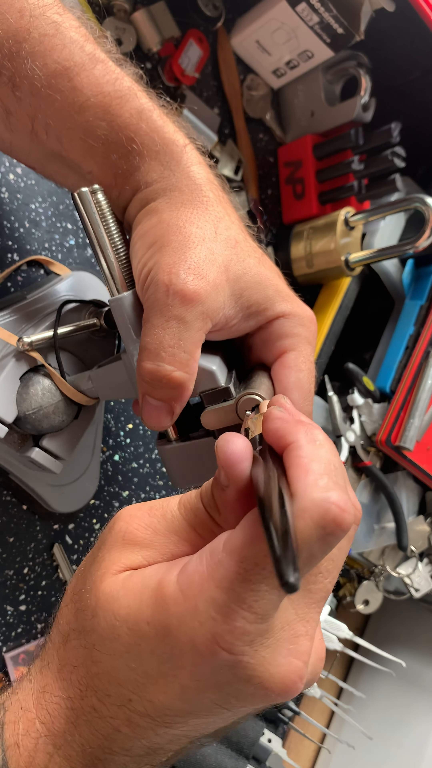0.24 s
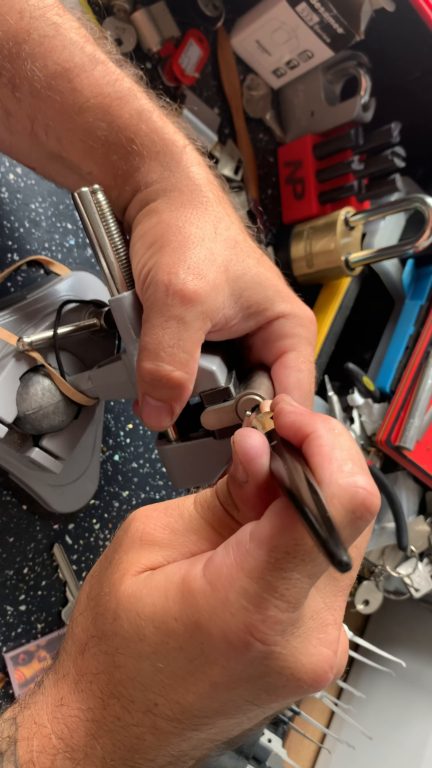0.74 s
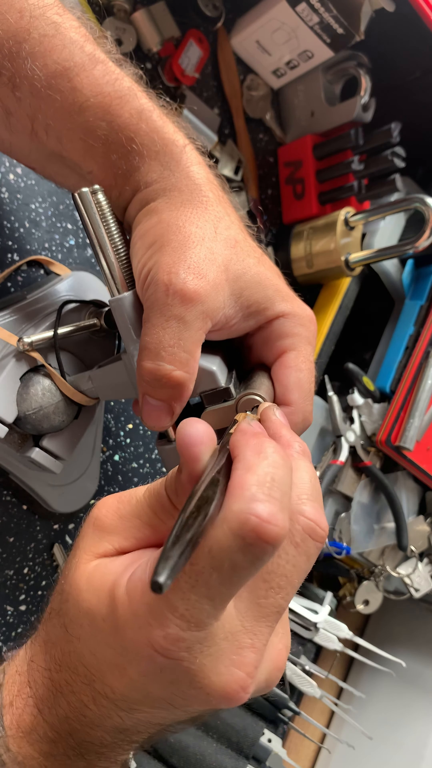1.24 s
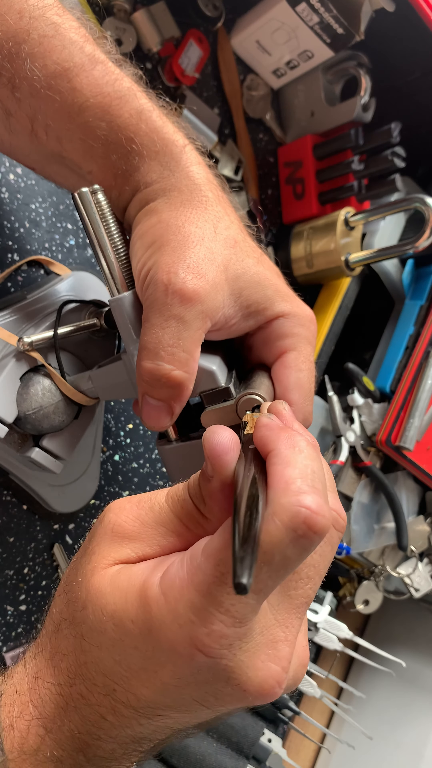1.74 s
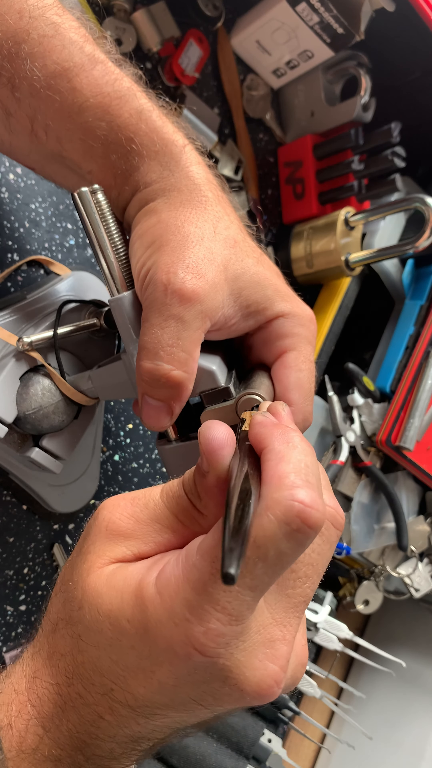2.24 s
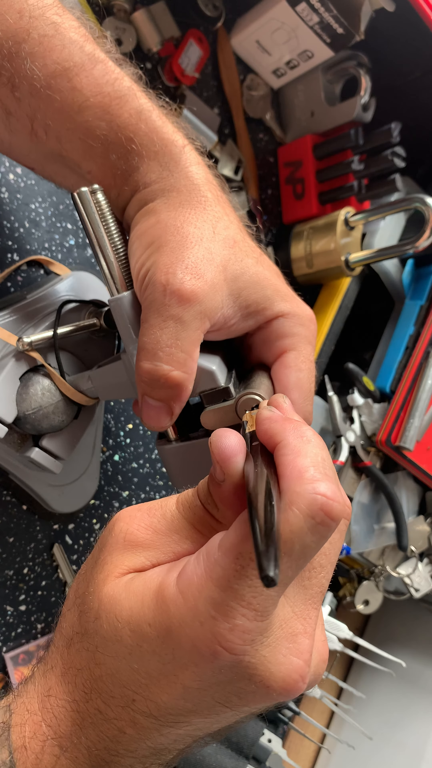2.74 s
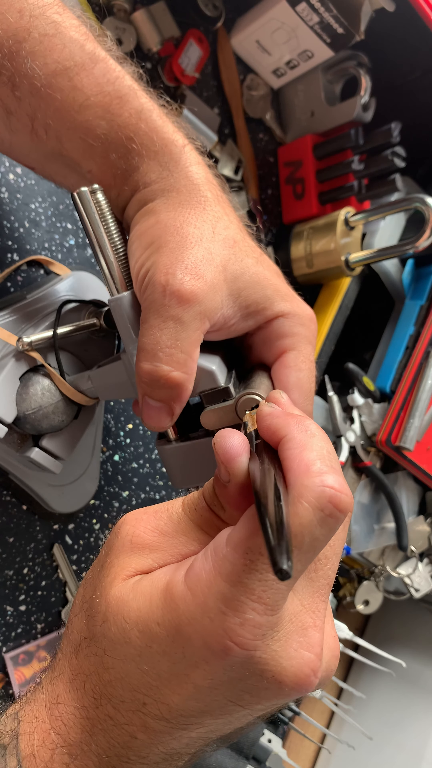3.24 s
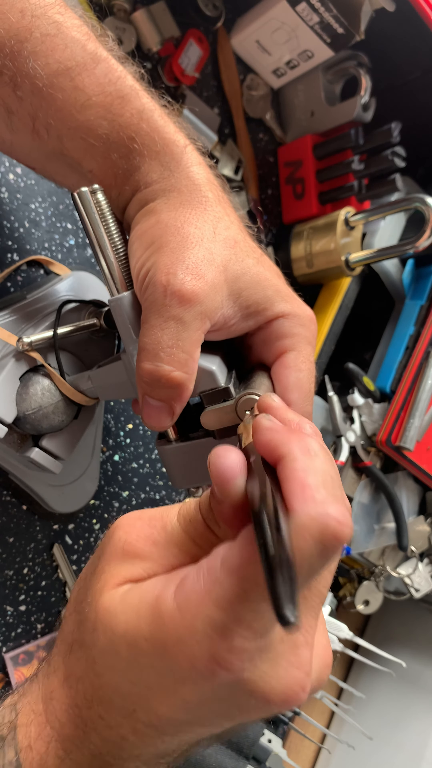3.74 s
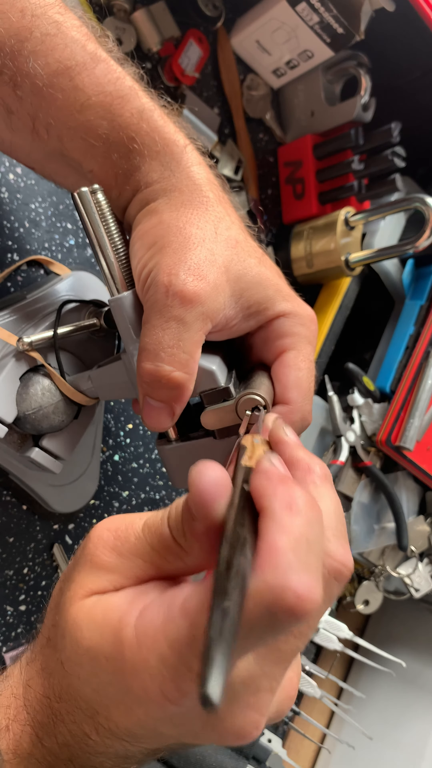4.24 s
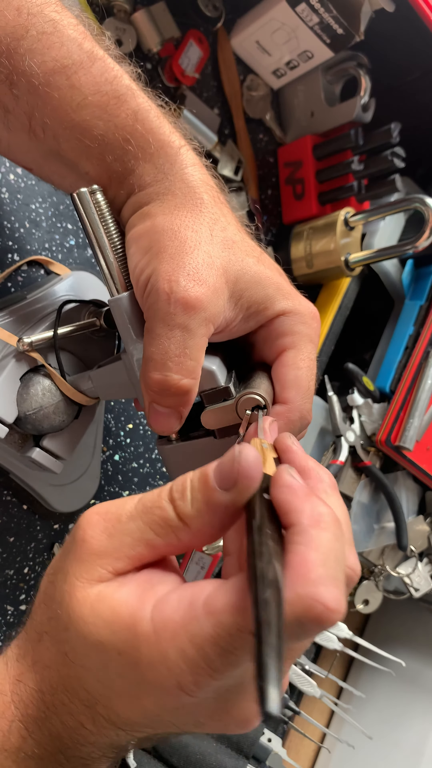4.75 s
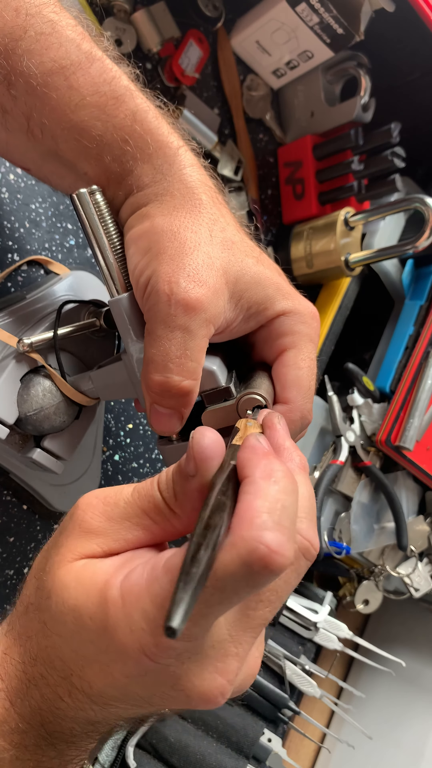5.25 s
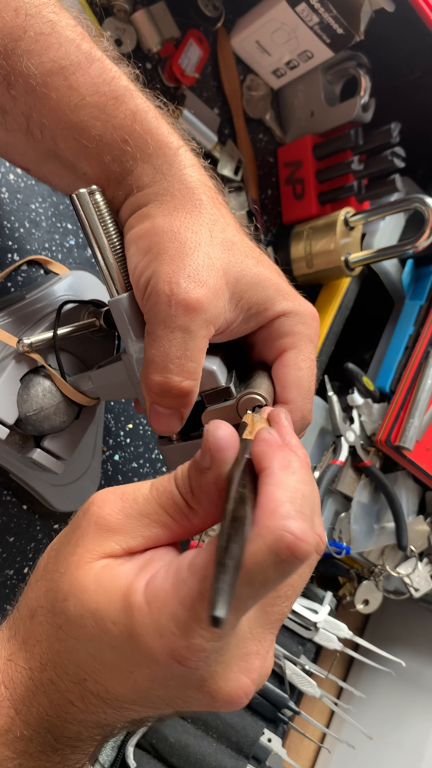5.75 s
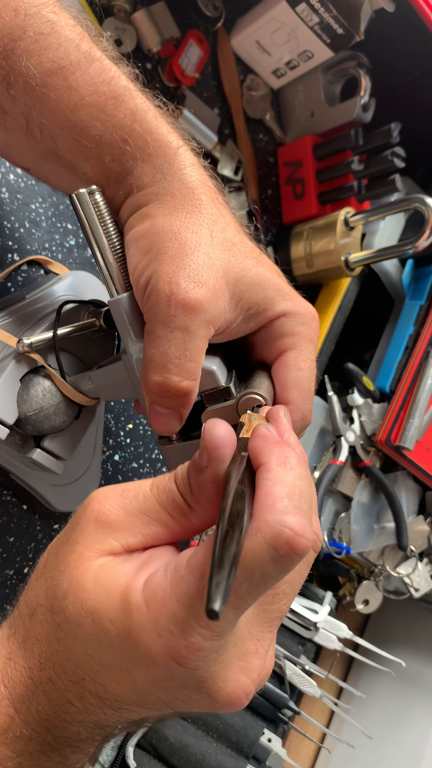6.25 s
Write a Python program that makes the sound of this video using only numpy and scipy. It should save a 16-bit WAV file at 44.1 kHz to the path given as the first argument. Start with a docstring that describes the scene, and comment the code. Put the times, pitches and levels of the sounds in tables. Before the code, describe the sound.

Close, crisp lock-pin snaps and faint scrapes in a quiet small room, broken by a sharp double clack, with a faint clock-like whirr each second.

```python
"""Still air with a wavering hum and a faint rub of hands, then the ticks and snaps of a lock being picked.
A steel pick works the pins of a lock cylinder held in a bench vise, close below the microphone in a small room.
Noise bursts ring the modes of lock and blade; once the plug gives way with a loud, rattling clack that sets
the bench modes swinging. Scrapes, rattles and taps of the blade are gritty noise or impacts in such modes too.
Soft knocks are filtered pushes; a noisy, gritty whirr comes once a second, likely a wall clock."""
import sys
import numpy as np
from scipy import signal
from scipy.fft import rfft, irfft
from scipy.io import wavfile

SR = 44100
rng = np.random.default_rng(int(sys.argv[2]) if len(sys.argv) > 2 else 0)


def generate_wav(sig):
    """Save sig (samples, or channels by samples) to the path in sys.argv[1] as 16-bit PCM at SR."""
    pcm = np.round(np.clip(np.atleast_2d(sig).T, -1, 1) * 32767).astype(np.int16)
    wavfile.write(sys.argv[1], SR, pcm)


N = 285768
TIME, FREQS = np.arange(N) / SR, np.fft.rfftfreq(N, 1 / SR)
CLICK_SIZE, SCRAPE_SIZE = 2048, 8192  # samples

# Resonances of the lock body. Each row: frequency in Hz, width in Hz, level in dB.
LOCK_MODES = [(1347.5, 120, -7), (1940, 233, 4), (1947, 110, 1), (3010, 260, -6.5), (3630, 540, -3),
              (4130, 390, -0.5), (5320, 130, 3), (6076, 320, 5.5), (6800, 200, -4.5), (7345, 120, -3),
              (8080, 660, -7.5), (10000, 390, 1.5), (10515, 150, 4), (11330, 150, 1), (12040, 320, 7),
              (13120, 760, 0.5), (15700, 840, -2.5), (14300, 420, -5)]


def from_db(db):
    """Decibels to gain."""
    return 10 ** (np.asarray(db) / 20)


def at_hz(points, hz):
    """Read a table of (Hz, value) on a log-frequency axis."""
    table_hz, values = np.array(points).T
    return np.interp(np.log(hz + 1), np.log(table_hz), values)


def add(track, s, sound):
    """Mix a sound in at a time in seconds."""
    start = max(round(s * SR), 0)
    track[start:start + len(sound)] += sound[:N - start]


def diffuse(size):
    """Spectra of white noise from all around, as the two microphone ports hear it."""
    # How alike diffuse sound is at the two ports. Each row: frequency in Hz, correlation from -1 to 1.
    likeness = [(60, 1), (250, 0.4), (520, -.2), (1000, .4), (2000, 0.1), (3500, 0.5), (5000, .93),
                (15000, .88)]
    alike = np.clip(at_hz(likeness, np.fft.rfftfreq(size, 1 / SR)), -1, 1)
    mid, side = rfft(rng.standard_normal((2, size)))
    return np.sqrt((1 + alike) / 2) * mid + np.sqrt((1 - alike) / 2) * side * [[1], [-1]]


def coloured_noise(colour):
    """Stereo noise of a given spectrum, rms 1."""
    noise = irfft(diffuse(N) * from_db(at_hz(colour, FREQS)), N)
    return noise / noise.std()


def uneven(size, depth_db, step_s):
    """A gain that wanders in straight lines between random levels, one per step; rms 1."""
    steps = np.arange(size) / SR / max(step_s, .001)
    levels_db = depth_db * np.interp(steps, np.arange(size), rng.standard_normal(size))
    gain = from_db(levels_db)
    return gain / np.sqrt(np.mean(gain ** 2))


def resonate(impacts, modes, crack_db, scatter_db, detune=0.0091):
    """Impacts ring a set of modes, a little differently each time, and are heard bare as well."""
    sound = from_db(crack_db) * impacts
    for hz, width, db in modes:
        r = np.exp(-np.pi * width / SR)  # pole radius: a wider mode dies sooner
        hz = hz * (1 + detune * rng.uniform(-1.0, 1))
        feedback = [1, -2 * r * np.cos(2 * np.pi * hz / SR), r * r]
        ringing = signal.lfilter([(1 - r * r) / 2, 0, (r * r - 1) / 2], feedback, impacts + 1e-18)
        sound = sound + from_db(db + scatter_db * rng.standard_normal()) * ringing
    return sound


def contact(length_ms, modes, crack_db, scatter_db, grit_db):
    """Metal slips on metal: a dying burst of tiny impacts rings the modes; energy of 1 ms at full scale."""
    ms = np.arange(CLICK_SIZE) * 1000 / SR
    age = ms / max(length_ms, .5)
    impacts = rng.standard_normal(CLICK_SIZE) * from_db(grit_db * rng.standard_normal(CLICK_SIZE))
    impacts *= (1 - np.exp(-age * 6.6)) * np.exp(-age * 1.1)
    sound = resonate(impacts, modes, crack_db, scatter_db)
    return sound * np.sqrt(SR / 1000 / np.sum(sound ** 2))


def tinted(sound, colour):
    """Give a short sound a broad tone colour, with minimum phase so that nothing comes early."""
    size = len(sound)
    gain = from_db(at_hz(colour, np.fft.rfftfreq(size, 1 / SR)))
    cepstrum = irfft(np.log(gain))
    # folding the cepstrum onto positive times gives the minimum phase
    cepstrum[1:size // 2] *= 2
    cepstrum[size // 2 + 1:] = 0
    return irfft(rfft(sound) * np.exp(rfft(cepstrum)))


def background(air_db=-73, hum_hz=51, hum_db=-69.5):
    """Still air and hiss are shaped noise; the low hum is a sine whose level wavers slowly."""
    # Spectrum of room air and microphone hiss. Each row: frequency in Hz, level in dB.
    air = [(20, -12), (45, 3.5), (70, -1.5), (110, -9), (250, -22), (500, -27), (1000, -32.5),
           (2000, -25.5), (4000, -33), (6300, -28.5), (8000, -33.5), (12000, -30.5), (14500, -34.5),
           (16000, -43)]
    waver = coloured_noise([(1, 0), (5, 0), (20, -40), (100, -120)])[0]
    hum = np.sqrt(2) * from_db(hum_db + 1.6 * waver) * np.sin(2 * np.pi * hum_hz * TIME)
    return hum + from_db(air_db) * coloured_noise(air)


def hands():
    """Skin shifting on the vise in small uneven moves rumbles through the bench."""
    # How strongly the hands rub, joined by straight lines. Each row: time in seconds, level in dB.
    handling = [(0.0, -75), (0.379, -71), (0.72, -76), (0.97, -75.5), (1.19, -70), (1.39, -65), (1.5, -72),
                (1.84, -78), (2.09, -78.5), (2.42, -72), (2.67, -78), (2.87, -74.5), (3.121, -76),
                (3.3, -69.5), (3.542, -75), (3.742, -48), (3.86, -60), (3.92, -71), (4.059, -72.5),
                (4.31, -65), (4.53, -72), (4.67, -74), (5.2, -69), (5.45, -65), (5.65, -72), (5.9, -63),
                (6.04, -64.5), (6.169, -70), (6.48, -61.5)]
    # Spectrum of the rumble. Each row: frequency in Hz, level in dB.
    hand_colour = [(40, -9), (75, 0), (120, -3.5), (160, 5), (200, -6), (320, -5.5), (500, -17.5),
                   (1000, -20.5), (3000, -29), (12000, -53)]
    s, db = np.transpose(handling)
    effort = from_db(np.interp(TIME, s, db))
    return effort * uneven(N, depth_db=3.5, step_s=0.044) * coloured_noise(hand_colour)


def pins(crack_db, scatter_db, hard_crack_db=14.5):
    """Each pin snaps at its own depth and so has its own colour; harder snaps crack more and ring less."""
    # Snaps of pins and plug. Each row: start in seconds, level in dB before a 3 dB cut, length of the
    # contact in ms, then colour in dB against the middle band at 1, 2, 10 and 14 kHz.
    pin_clicks = [(0.1509, -42, 2.7, -5, 0, -15, -16), (0.1887, -29, 2.1, 2, 2, 4.5, -7.5),
                  (0.2909, -66, 1.9, 26.5, 16, -19, -7), (0.951, -46.5, 3.3, -23, -12, 9, -14),
                  (0.9686, -33.5, 2.3, -17, 5, -7, -6), (0.9786, -46, 2.4, 0, 0, -1.5, -12),
                  (1.0237, -41, 3.9, 3.5, 11.5, 4, -12), (1.0612, -42, 5.6, -16, -2, 0, -18),
                  (1.1056, -47.5, 2.7, -24, -3, -4, -11), (1.215, -46.5, 3.3, -2, -3, 2.5, -22),
                  (1.23, -47, 4.8, -9, 2, -16, -16), (1.404, -44, 2.4, 5.5, -8, -11, -17),
                  (1.5628, -49, 2.9, -10, 0, -14.5, -17), (2.3014, -46, 1.4, -9, -11, -5, -8),
                  (2.8588, -40.5, 2, -6, 11, -5, -11), (2.9438, -18, 2.5, -13.5, 0.5, 4.5, -1.5),
                  (3.3825, -39, 1.3, -2, 6, 2, 1.5), (3.6645, -33.5, 1.9, -11, 1.5, 6, -4),
                  (3.7233, -4, 6.2, -7, -4, 5, -1), (3.73, -18, 9.6, -9, 1, 3, 5),
                  (3.7387, -7, 8.3, -11, -9, 7, 0), (3.752, -16.5, 1.9, -28, 8.5, 14, -7),
                  (3.8897, -23.5, 2.9, -31, -6, 5.5, 7), (4.016, -30.5, 3, -13.5, 2, 0.5, 3.5),
                  (4.037, -33, 4.7, -18.5, -8.5, -14.5, -7), (4.044, -44, 1.9, -6.5, 8, -8, -9.5),
                  (4.094, -52.5, 2.2, -4.5, -5.5, -1, -16), (4.9013, -49.5, 2.16, -5.5, -8, 5, 2.5),
                  (4.9398, -49.5, 2.5, -12, -10.5, 0.5, 4), (5.153, -38.5, 7, -0.5, -8.5, -9.5, -10.5),
                  (5.4875, -39.5, 2.2, 12.5, -3, -10.5, -24.5), (5.688, -51, 3, -4, 4, 6, -14),
                  (5.854, -32, 3.1, -0.5, -2, -5.5, -10.5), (5.872, -41, 11, 13, 0.5, -14, -5),
                  (6.1033, -42, 4.7, 3, 9, -18, -12), (6.4, -34.5, 2.4, -1.5, -4, -3, 0),
                  (6.409, -49.5, 8.7, 7, 12, -17, -26)]
    # Corner frequencies of the click colours, in Hz.
    colour_hz = [1000, 2000, 3000, 7000, 10000, 14000]
    out = np.zeros(N)
    for s, db, length_ms, low, body, bright, top in pin_clicks:
        hardness = min(from_db(db), 1)
        click = contact(length_ms, LOCK_MODES, crack_db + hard_crack_db * hardness, scatter_db, grit_db=3.5)
        colour = list(zip(colour_hz, (low, body, 0, 0, bright, top)))
        add(out, s, from_db(db - 3.0) * tinted(click, colour))
    return out


def steel(clicks, ring_db=-52):
    """Every sound of the lock leaves a thin, faint ring in the steel of lock and vise."""
    # Long steel modes. Each row: frequency in Hz, level in dB, time to fall 60 dB in seconds.
    steel_ring = [(1405, 2.5, 0.33), (1777, -7, .26), (1980, -10.5, 0.26), (3150, 2, .3), (3940, -2, 0.23),
                  (5790, 0, 0.36), (6640, -1.5, 0.2), (7000, -1, 0.31), (9772, 0, 0.12), (11500, 2, .2),
                  (11468, 0.5, 0.32), (14700, -2, .2)]
    t = TIME[:SR]
    ring = sum(from_db(db - 60 * t / t60) * np.sin(2 * np.pi * hz * t) for hz, db, t60 in steel_ring)
    return from_db(ring_db) * signal.fftconvolve(clicks, ring)[:N]


def room(x, early_db=-13, early_t60=0.022, gap_s=0.0066, fade_s=0.22):
    """Bench clutter scatters sound at once; walls add an uneven tail, dying band by band, ever faster."""
    # Tail of the small room. Each row: band centre in Hz, time to fall 60 dB in seconds, level in dB.
    bands = [(150, 0.55, -1.5), (503, 0.22, -4.5), (970, 0.24, -1), (1980, 0.29, -7), (4040, 0.22, -9.5),
             (7000, 0.49, -10.5), (10510, 0.55, -17.5), (15000, 0.5, -17)]
    t, hz, noise = TIME[:SR], np.fft.rfftfreq(SR, 1 / SR), diffuse(SR)
    arrival = (1 - np.exp(-(t / gap_s) ** 2)) * np.exp(-(t / fade_s) ** 2)
    arrival *= uneven(SR, depth_db=-0.5, step_s=0.0036)

    def dying(t60):
        """A decay of unit energy."""
        shape = arrival * from_db(-60 * t / t60)
        return shape / np.sqrt(np.sum(shape ** 2))

    response = from_db(early_db) * dying(early_t60) * irfft(noise, SR)
    for k, (_, t60, db) in enumerate(bands):
        # each band fades into its neighbours
        share = at_hz([(row[0], j == k) for j, row in enumerate(bands)], hz)
        response += from_db(db) * dying(t60) * irfft(noise * share, SR)
    return signal.fftconvolve(x[None], response, axes=1)[:, :N]


def bench(swell_s=0.0059):
    """Jolts set the low modes of bench and vise swinging; they take a moment to build."""
    # Jolts through the vise into the bench. Each row: time in seconds, level in dB.
    jolts = [(0.194, -61.5), (1.027, -58), (2.945, -50.5), (3.383, -59.5), (3.726, -35.5), (3.751, -32),
             (3.886, -57), (4.028, -53.5), (4.71, -57.5), (5.855, -67), (6.103, -58), (6.403, -58.5)]
    # Low modes of bench and vise. Each row: frequency in Hz, level in dB, time to fall 60 dB in seconds.
    bench_modes = [(45.3, -18.5, 0.69), (80.5, -14, .38), (117.9, -10, .35), (161.4, -1.5, 0.47),
                   (219.6, -5.5, 0.24), (299, -2.5, 0.14), (387.4, -13, .14), (443.4, -9.5, 0.094),
                   (531, -17, 0.17), (693, -18.5, 0.098)]
    pushes, t = np.zeros(N), TIME[:SR]
    for s, db in jolts:
        add(pushes, s, from_db([db]))
    swing = sum(from_db(db - 60 * t / t60) * np.sin(2 * np.pi * hz * t) for hz, db, t60 in bench_modes)
    return signal.fftconvolve(pushes, swing * (1 - np.exp(-t / swell_s)))[:N]


def rattles(bounces_per_s=170):
    """Loose pins and springs bounce on at uneven moments after a hard snap, ever more weakly."""
    # Bouts of rattling. Each row: start in seconds, level in dB, fade in seconds.
    bouts = [(0.199, -59, 0.018), (0.984, -76, 0.045), (2.965, -48.5, 0.04), (3.764, -45.5, 0.094),
             (4.024, -56, 0.025), (5.881, -67.5, .028)]
    out, t = np.zeros(N), TIME[:SCRAPE_SIZE]
    for s, db, fade_s in bouts:
        moments = rng.random(len(t)) < bounces_per_s / SR
        bounces = moments * from_db(3.5 * rng.standard_normal(len(t)))
        tick = contact(2.5, LOCK_MODES, crack_db=-2.0, scatter_db=4.5, grit_db=-3.0)
        chatter = signal.fftconvolve(bounces, tick)[:len(t)]
        add(out, s, from_db(db) * np.exp(-t / fade_s) * chatter / (chatter.std() + 1e-12))
    return out


def clock(rise_s=0.016, hold_s=0.025, t60=0.33, lead_s=.06):
    """Once a second the gears step on: a short, gritty whirr in a thin case, dying away in the room."""
    # Steps of the clock. Each row: time in seconds, level in dB, brightness from 3 kHz up in dB.
    beats = [(.366, -65, 6.5), (1.36, -63.5, 6), (2.37, -67.5, 3), (3.37, -62.5, -2), (4.37, -66.5, -0.5),
             (5.367, -63, -1), (6.37, -63.5, -4)]
    # Resonances of its case. Each row: frequency in Hz, width in Hz, level in dB.
    case_modes = [(700, 300, 10), (1310, 130, 8), (1950, 130, 9.5), (2870, 130, 5), (3430, 200, 4.5),
                  (4000, 130, 1.5), (4700, 260, -3.5), (5400, 150, 7), (7900, 290, 4.5)]
    # Broad colour of the whirr. Each row: frequency in Hz, level in dB.
    clock_colour = [(300, -10), (700, 0.5), (1500, 0), (3000, 1), (5000, -3), (7000, -10), (9000, -17),
                    (15000, -24)]
    out, t = np.zeros((2, N)), TIME[:2 * SCRAPE_SIZE] - lead_s  # the lead leaves time to swell
    shape = np.exp(np.minimum(t, 0) / rise_s) * from_db(-60 * np.maximum(t - hold_s, 0) / t60)
    for s, db, bright in beats:
        case = resonate(signal.unit_impulse(len(t)), case_modes, crack_db=-4, scatter_db=2.5)
        case = tinted(tinted(case, clock_colour), [(1200, 0.025), (3000, bright)])
        teeth = irfft(diffuse(len(t))) * shape * uneven(len(t), depth_db=3, step_s=0.0038)
        whirr = signal.fftconvolve(teeth, case[None], axes=1) / np.linalg.norm(case)
        for port, sound in zip(out, whirr):
            add(port, s - lead_s, from_db(db) * sound)
    return out


def knocks():
    """Dull knocks, perhaps knuckles on the vise: each is one push, with neither treble nor deep bass."""
    # Soft contacts. Each row: time in seconds, peak level in dB, lowest and highest frequency in Hz.
    thuds = [(2.994, -52, 220, 403), (4.486, -60.5, 700, 1160), (4.577, -70, 716, 855),
             (5.6059, -46.5, 93.4, 436), (6.391, -49.5, 544, 768.5)]
    out = np.zeros(N)
    for s, db, low_hz, high_hz in thuds:
        band = signal.butter(2, [low_hz, max(high_hz, low_hz + 50)], "band", fs=SR, output="sos")
        thud = signal.sosfilt(band, signal.unit_impulse(CLICK_SIZE))
        add(out, s, from_db(db) * thud / np.abs(thud).max())
    return out


def scrapes():
    """The tip sticks and slips across a pin: a gritty swell in the lock body."""
    # Drags of the pick. Each row: start in seconds, level at the height of the swell in dB, swell in
    # seconds, fade in seconds, then colour in dB against the middle band at 700 Hz and 11 kHz.
    drags = [(3.345, -54.5, 0.037, 0.0086, -4.5, -19.5), (4.869, -73.5, 0.025, .06, -8.5, -3.5),
             (5.136, -64, 0.0063, 0.05, 12, -2), (5.45, -63, 0.035, 0.04, 1, -9),
             (6.367, -62.5, 0.011, 0.023, 8, -24)]
    out, t = np.zeros(N), TIME[:SCRAPE_SIZE]
    for s, db, swell_s, fade_s, low, bright in drags:
        slips = rng.standard_normal(len(t)) * uneven(len(t), depth_db=3.5, step_s=0.0027)
        rub = resonate(slips, LOCK_MODES, crack_db=5.0, scatter_db=-2.0)
        rub = tinted(rub, [(700, low), (2500, 0), (6000, 0), (11000, bright)])
        shape = np.minimum(t / swell_s, 1) ** 2 * np.exp(-np.maximum(t - swell_s, 0) / fade_s)
        add(out, s, from_db(db) * shape * rub / rub.std())
    return out


def pick():
    """The thin blade taps the keyway and rings briefly with a few bending modes, damped by the fingers."""
    # Taps on the keyway. Each row: time in seconds, level in dB, brightness from 12 kHz up in dB.
    taps = [(4.2211, -61, 6), (4.4603, -57, -12), (4.6771, -31.5, -1), (4.6935, -47, 4), (4.702, -52, 9.5),
            (4.985, -63, 0)]
    # Bending modes of the blade. Each row: frequency in Hz, width in Hz, level in dB.
    blade_modes = [(3635, 360, 15), (6850, 560, 16), (8600, 700, 13), (11140, 730, 11.5),
                   (14310, 1320, -10.5)]
    out = np.zeros(N)
    for s, db, bright in taps:
        tap = contact(1.4, blade_modes, crack_db=-15, scatter_db=2.0, grit_db=0.0)
        add(out, s, from_db(db) * tinted(tap, [(7000, 0.0037), (12000, bright)]))
    return out


def scene():
    """The lock lies close below the microphone; the bench is a little louder on the right."""
    friction, blade = scrapes() + rattles(), pick()
    lock = pins(crack_db=-15.5, scatter_db=2.5) + friction
    # the room gets the lock's sound from all sides, where the modes even out
    all_round = pins(crack_db=1.0, scatter_db=-2.0) + friction
    metal = lock + steel(lock) + blade + room(all_round + from_db(-4.5) * blade)
    lows = (bench() + hands()) * from_db([[-1.7], [1.7]])  # left, right
    return metal + lows + knocks() + clock() + background() * from_db([[-.6], [.6]])


def record(dry, low_cut_hz=33, cutoff_hz=16000):
    """The right port hears everything a little later; the deepest bass and the top are cut."""
    # Phase by which the left port leads. Each row: frequency in Hz, lead in half turns.
    port_phase = [(0, 0), (500, 0), (2000, .28), (3500, .52), (4700, 1), (6900, 2), (9000, 3), (11100, 4),
                  (13200, 5), (15000, 6), (22050, 6)]
    lag = np.pi * np.interp(FREQS, *np.transpose(port_phase))
    right = irfft(rfft(dry[1]) * np.exp(-1j * lag), N)
    ports = np.array([dry[0], right])
    ports = signal.sosfilt(signal.butter(4, low_cut_hz, "high", fs=SR, output="sos"), ports)
    return signal.sosfilt(signal.ellip(10, .2, 80, cutoff_hz, fs=SR, output="sos"), ports)


dry = scene()
out = record(dry)
generate_wav(out)
```